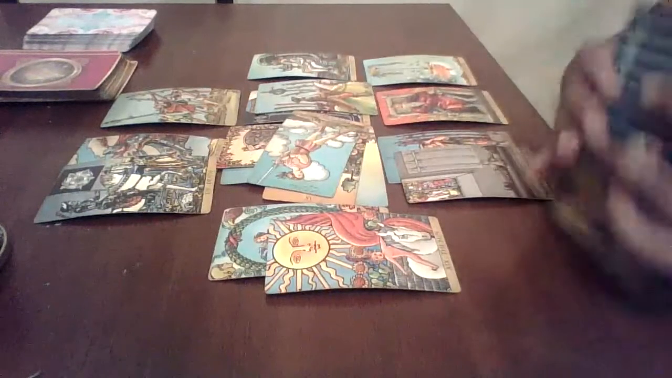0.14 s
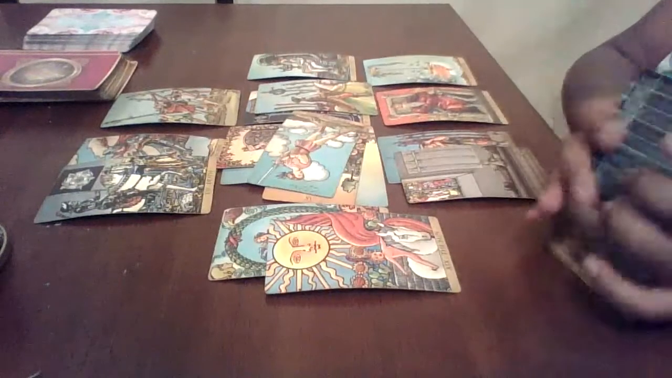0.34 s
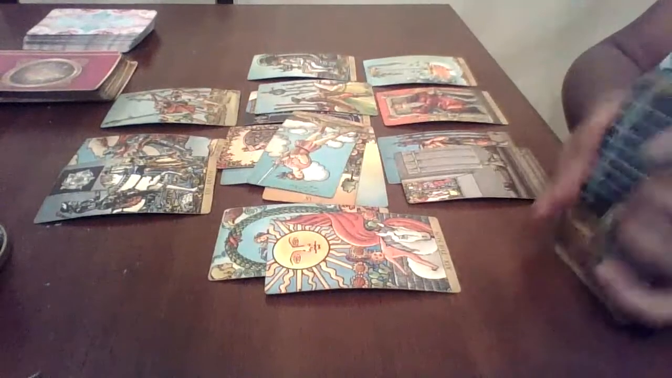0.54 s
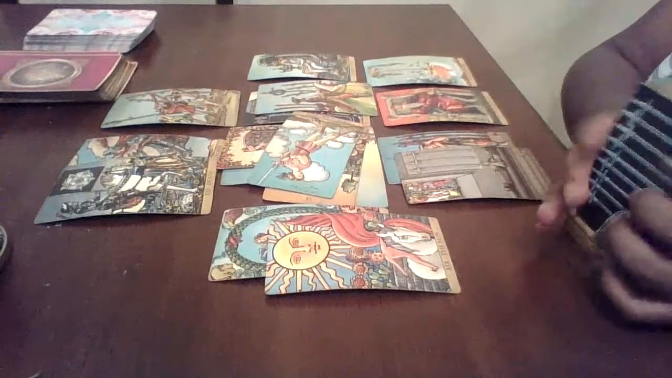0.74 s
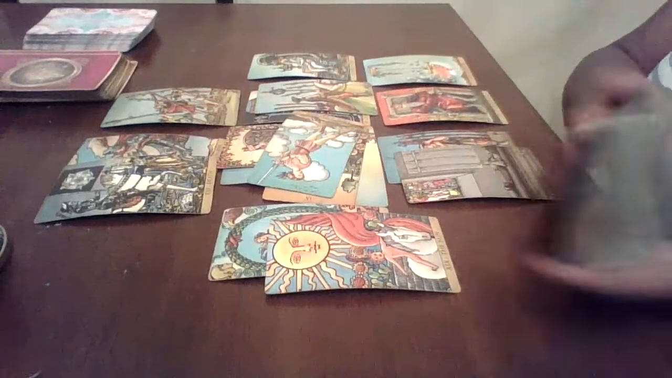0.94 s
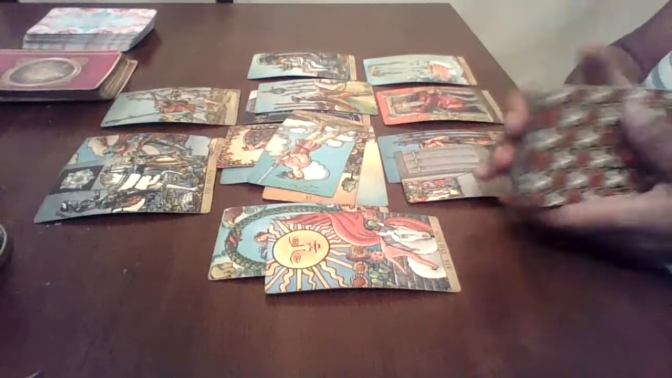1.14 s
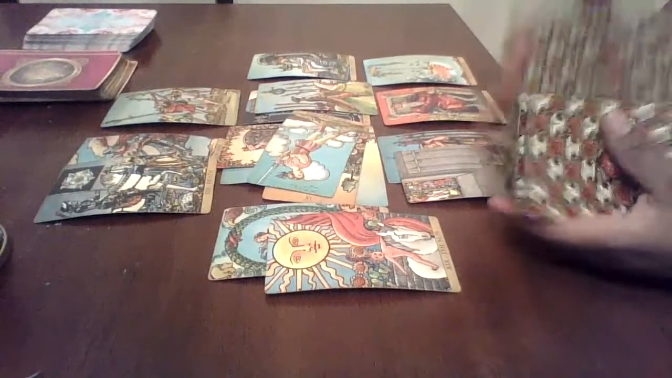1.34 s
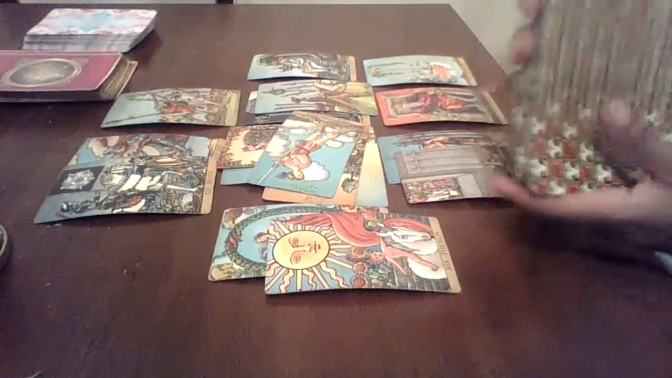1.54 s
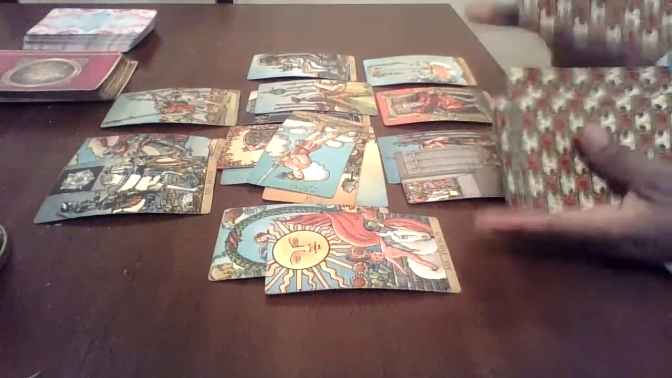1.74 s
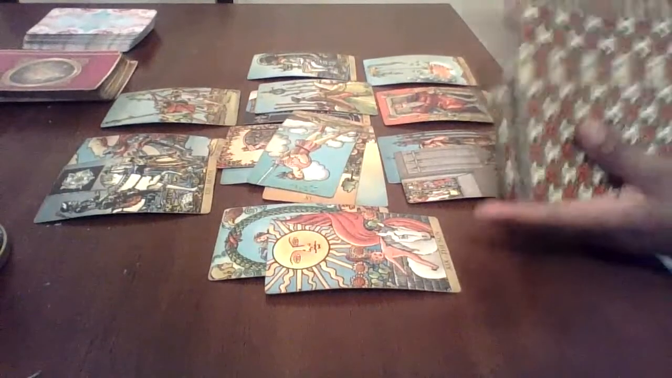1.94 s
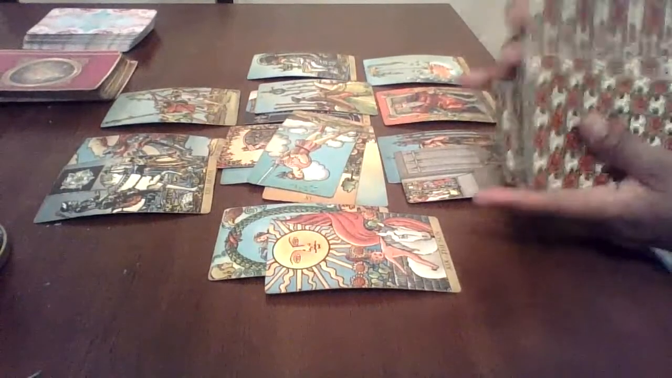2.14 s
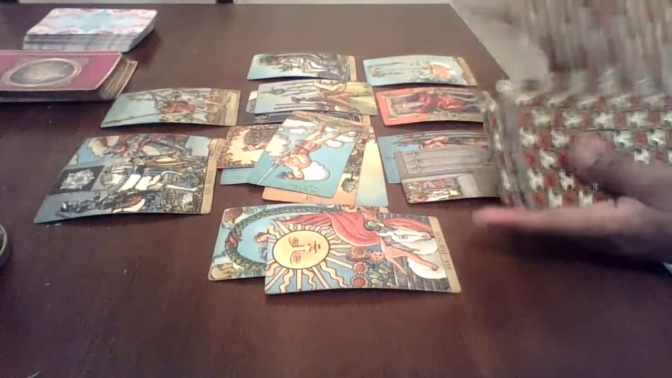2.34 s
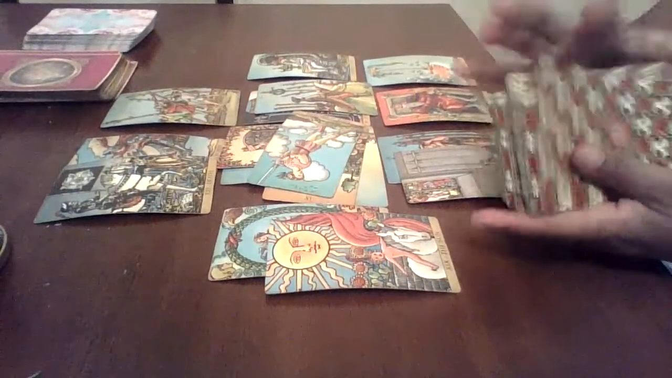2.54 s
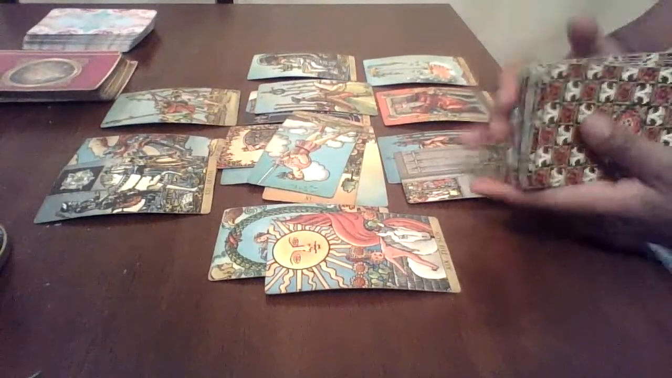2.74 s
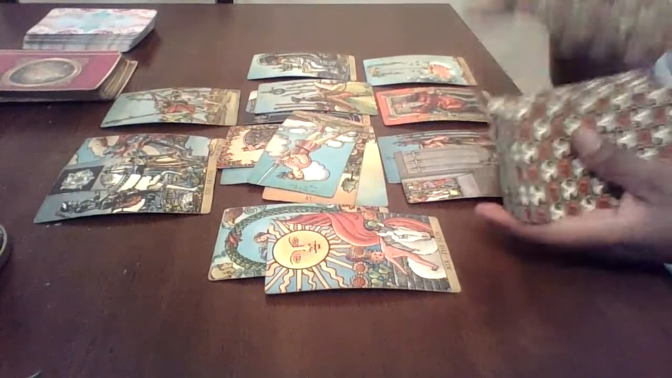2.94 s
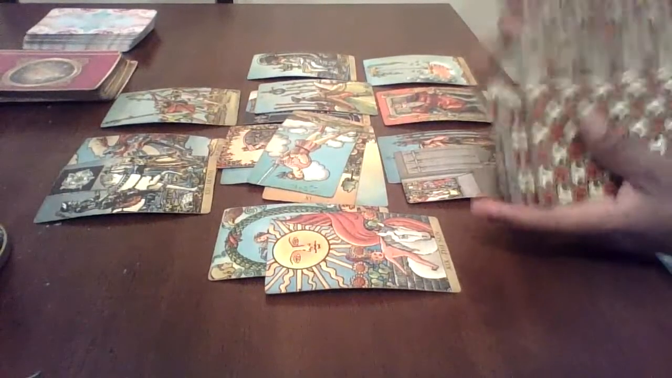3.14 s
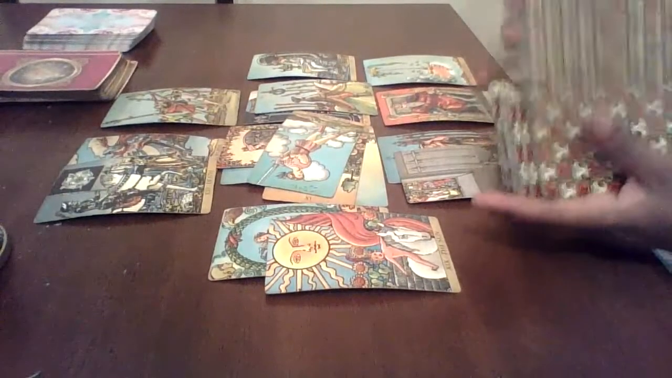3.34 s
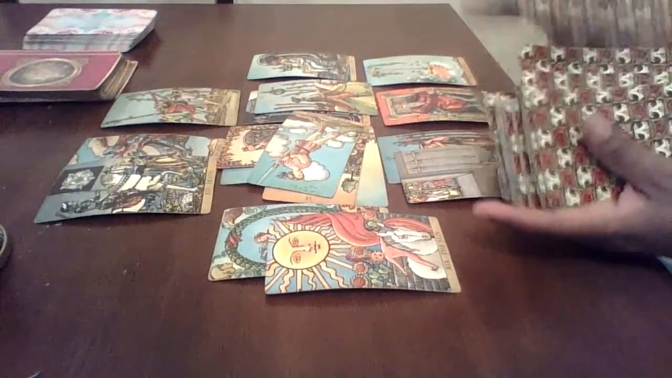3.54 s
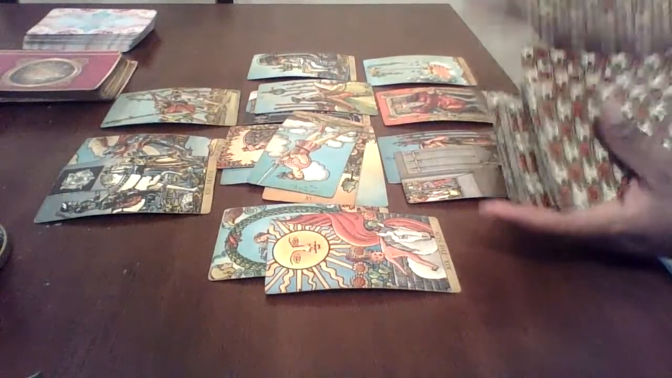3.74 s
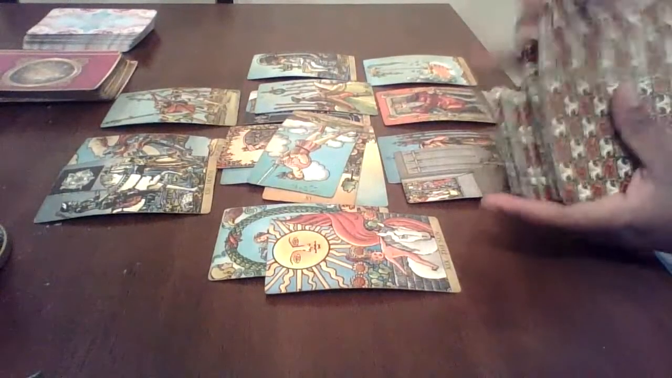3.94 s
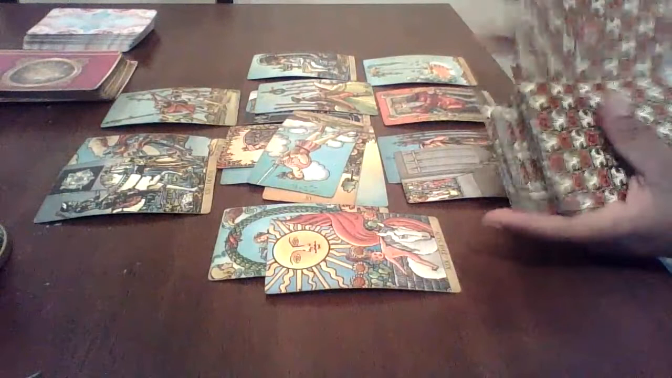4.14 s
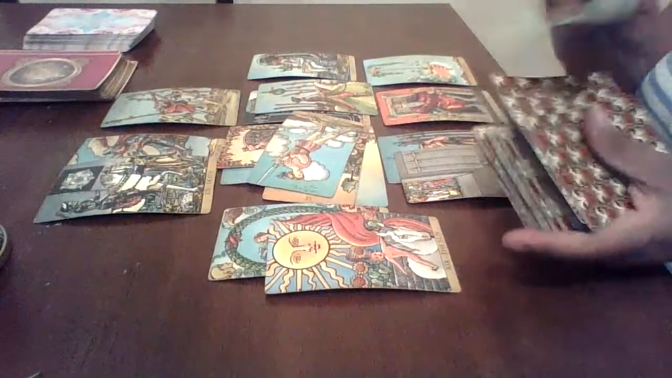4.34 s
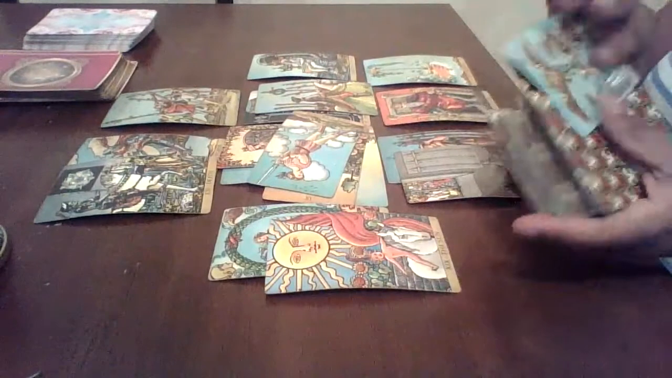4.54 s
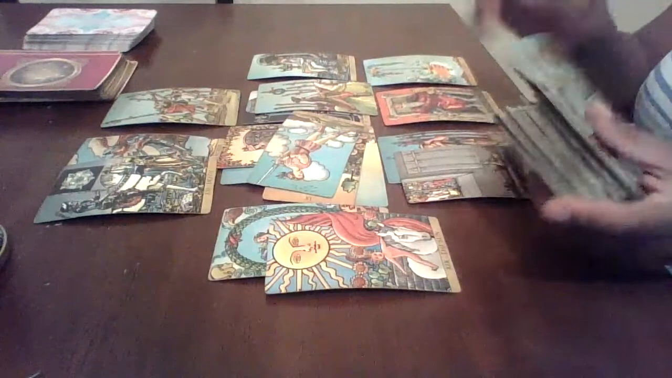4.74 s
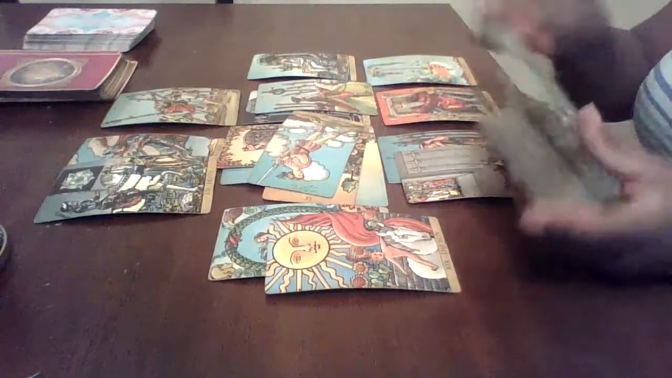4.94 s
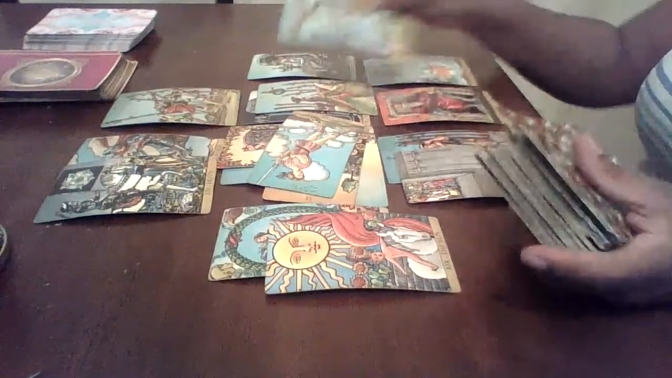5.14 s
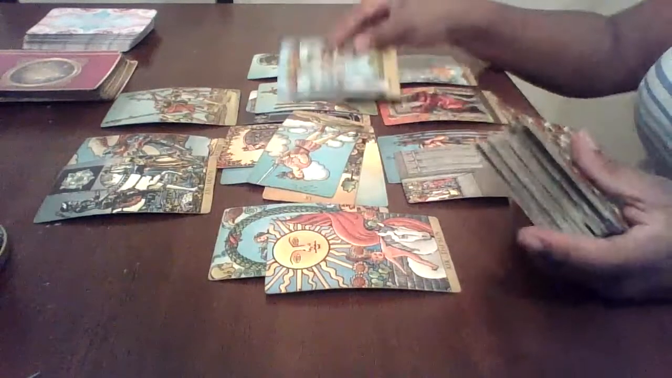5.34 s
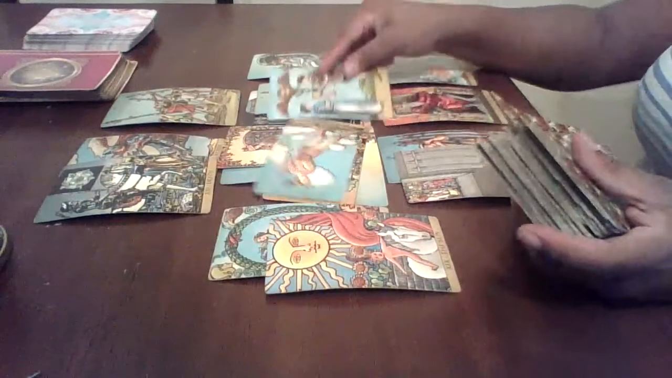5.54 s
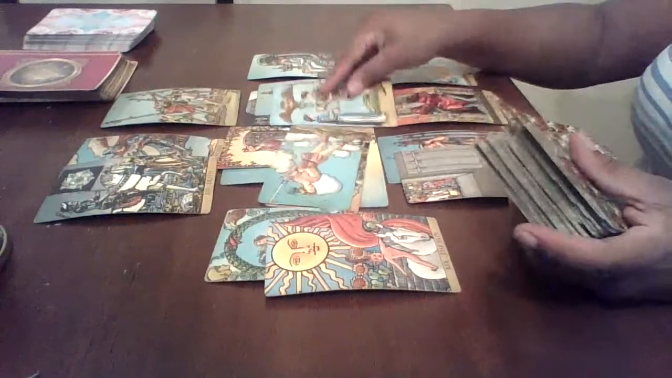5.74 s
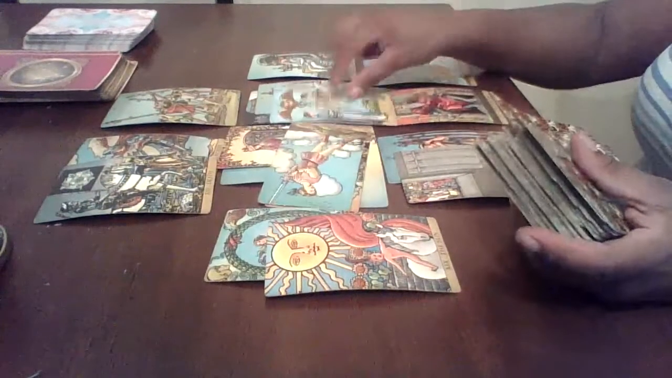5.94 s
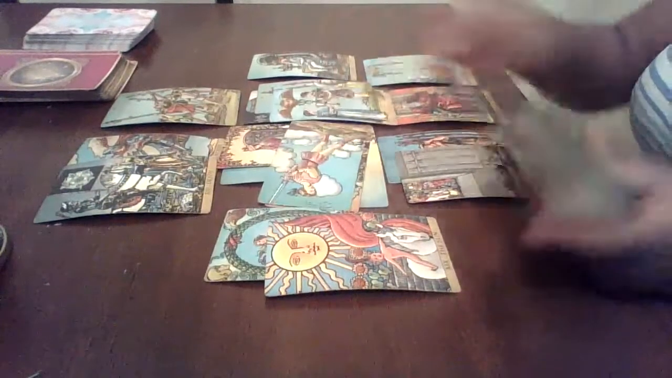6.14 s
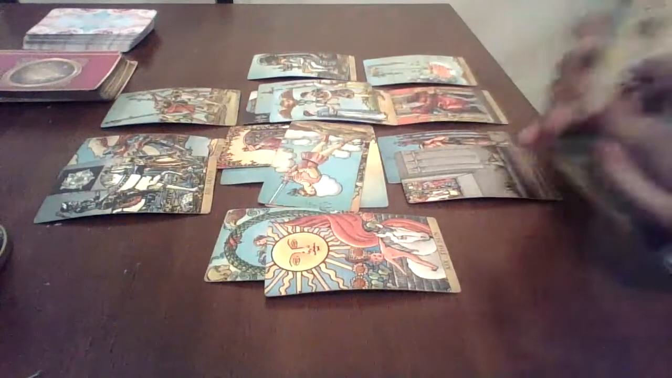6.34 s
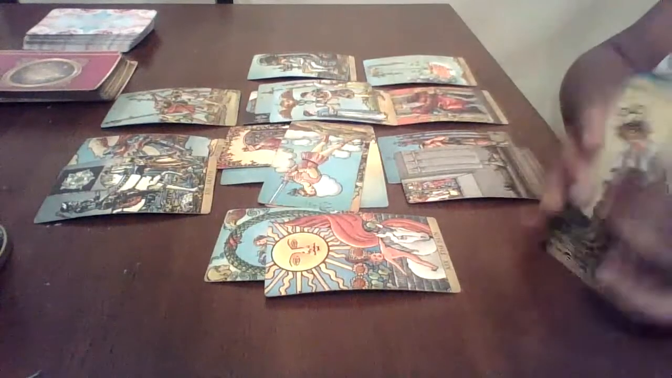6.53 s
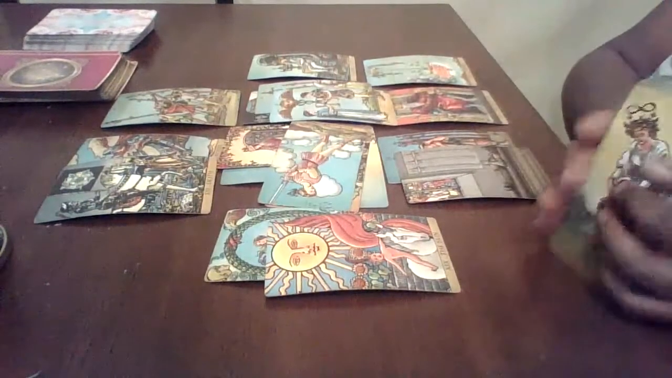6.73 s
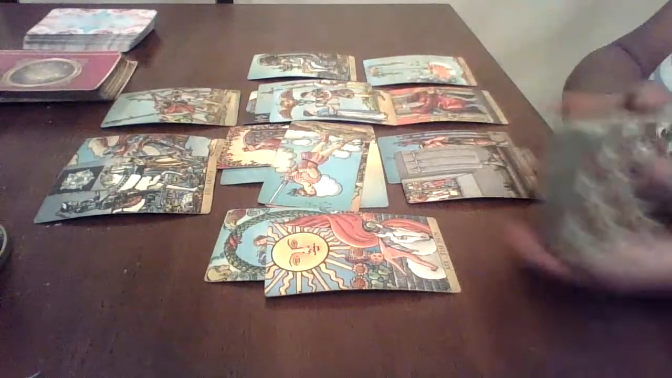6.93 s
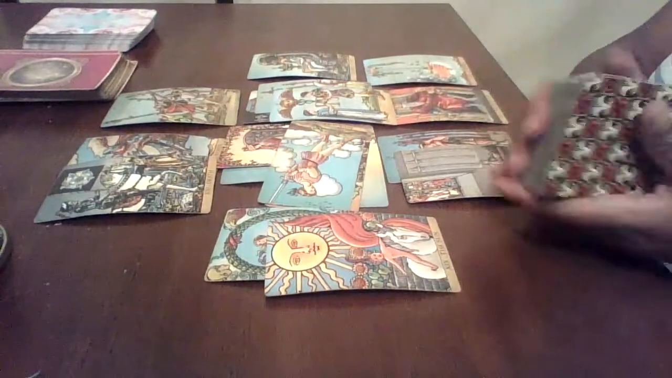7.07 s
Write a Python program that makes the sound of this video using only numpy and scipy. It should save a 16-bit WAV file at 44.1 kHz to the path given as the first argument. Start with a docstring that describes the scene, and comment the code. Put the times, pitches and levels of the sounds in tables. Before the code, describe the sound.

A deck of large cards is knocked on a wooden table, then shuffled overhand, the packets clicking as they meet and hissing as they slide. One packet slaps flat, a few edges tick, and a single card is dealt with a sharp snap. The deck is knocked down again and rubbed into line. It is all close to the microphone, in a room with a low appliance hum.

```python
"""Large cards at a wooden table, close to one microphone, in a room where an appliance hums throughout.
First the deck is knocked square, ringing the table top and the room. From about 1.5 s it is shuffled
overhand: packets click as their edges meet and hiss as they slide, until one slaps flat at 4.25 s.
A few edges tick, and at 5.9 s one card is dealt with a snap. At 6.5 s the deck is knocked down again,
and the fingers rub it into line."""
import sys
import numpy as np
from scipy import signal
from scipy.fft import rfft, irfft, next_fast_len
from scipy.io import wavfile

SR = 44100
rng = np.random.default_rng(int(sys.argv[2]) if len(sys.argv) > 2 else 0)


def inscribe(sig):
    """Save sig as 16-bit PCM at rate SR to the path in sys.argv[1].

    A 1-D sig is mono; a 2-D sig holds one channel per row.
    Samples are clipped to [-1, 1] before scaling.
    """
    pcm = np.round(np.clip(np.atleast_2d(sig).T, -1, 1) * 32767)
    wavfile.write(sys.argv[1], SR, pcm.astype(np.int16))


N = 315312
TIME = np.arange(N) / SR
AGE = TIME[:SR // 4]  # seconds since a contact
FFT_SIZE = next_fast_len(N, real=True)
FFT_HZ = np.arange(FFT_SIZE // 2 + 1) * SR / FFT_SIZE


def from_db(db):
    return 10 ** (np.asarray(db) / 20)


def unit_rms(x):
    return x / np.sqrt(np.mean(x ** 2) + 1e-20)


def at_hz(points, hz):
    point_hz, value = np.transpose(points)
    return np.interp(np.log(np.maximum(hz, 1)), np.log(point_hz), value)


def band(x, low_hz, high_hz, order=2):
    return signal.sosfilt(signal.butter(order, [low_hz, high_hz], "band", fs=SR, output="sos"), x)


def dulled(x, top_hz):
    """Gentle roll-off of the treble."""
    pole = np.exp(-2 * np.pi * top_hz / SR)
    return signal.lfilter([1 - pole], [1, -pole], x)


def coloured(x, spectrum):
    """Gives a steady noise its spectrum; rms 1."""
    return unit_rms(irfft(rfft(x, FFT_SIZE) * from_db(at_hz(spectrum, FFT_HZ)), FFT_SIZE)[:N])


def drift(rate_hz):
    """Smooth random motion; rms 1."""
    spectrum = rfft(rng.standard_normal(FFT_SIZE)) / (1 + (FFT_HZ / rate_hz) ** 2)
    return unit_rms(irfft(spectrum, FFT_SIZE)[:N])


def fade(t, t60):
    return np.exp(-np.log(1000) * t / t60)


# room tone, air and rumble: (frequency [Hz], relative level [dB])
AIR_SPECTRUM = [(120, -36), (200, -9.5), (236, -3.5), (258, -13.5), (293, 2), (327, -10), (399, -4.5),
                (607, -14.5), (742, -12), (827, -21), (1450, -23), (1680, -27), (2600, -31.5),
                (4030, -38.5), (15500, -42.5)]
RUMBLE_SPECTRUM = [(10, -21), (18, -1), (24, -8.5), (30, 9), (38, 7), (48, -17), (65, -8.5), (90, -2),
                   (105, -6), (135, -3), (175, -4.5), (205, -12), (260, -43.5)]
# the appliance in the background: (frequency [Hz], level [dB], unsteadiness [ratio])
HUM_LINES = [(119.9, -59.5, 0.24), (148.6, -50.5, 0.63), (234, -65, 1), (306.6, -65, 0.95)]

def background(air_db=-54, rumble_db=-47.5):
    """Behind the table, the appliance's wavering hum lies over a low rumble and the rush of air."""
    out = from_db(air_db) * coloured(rng.standard_normal(N), AIR_SPECTRUM)
    out += from_db(rumble_db) * coloured(rng.standard_normal(N), RUMBLE_SPECTRUM)
    for hz, db, unsteady in HUM_LINES:
        swing = (1 + unsteady * (drift(5.3) + 1j * drift(2.5))) / np.sqrt(1 + 2 * unsteady ** 2)
        out += from_db(db) * np.sqrt(2) * np.real(swing * np.exp(2j * np.pi * hz * TIME))
    return out


# the room's reverberation: (frequency [Hz], t60 [s])
ROOM_DECAY = [(100, 0.7), (500, 0.58), (2000, 0.61), (4500, 0.53), (8000, 0.49), (15000, 0.5)]

def room_echo(sources, build_s=0.00053, ripple_db=2.3):
    """In each band the room stores the sources' energy and returns it to the microphone as dying noise."""
    ripple = from_db(ripple_db * drift(41)[:N // 2 + 1])  # some pitches stand out from their neighbours
    diffuse = irfft(rfft(rng.standard_normal((2, N))) * ripple, N)
    floor = 1e-12 * diffuse[0]
    echo = np.zeros(N)
    edges_hz = np.geomspace(60, 18000, 16)
    for k, (low, high) in enumerate(zip(edges_hz, edges_hz[1:])):
        hz = np.sqrt(low * high)
        power = sum((from_db(at_hz(send, hz)) * band(x + floor, low, high)) ** 2 for x, send in sources)
        decay_s = at_hz(ROOM_DECAY, hz) / np.log(10 ** 6)
        for seconds in (build_s, decay_s):
            pole = np.exp(-1 / (seconds * SR))
            power = signal.lfilter([1 - pole], [1, -pole], power)
        echo += np.sqrt(power) * unit_rms(band(diffuse[k % 2], low, high))
    return echo


# the room's low standing waves: (frequency [Hz], relative level [dB], t60 [s])
STANDING_WAVES = [(66, -6, 0.42), (115.4, -10.5, 0.28)]

def room_boom(knock, wall_delay_s=0.031):
    """The bass of a knock comes back off the far wall and sets the standing waves going."""
    waves = sum(from_db(db) * fade(AGE, t60) * np.sin(2 * np.pi * hz * AGE) * 2 * np.pi * hz / SR
                for hz, db, t60 in STANDING_WAVES)
    bass = signal.fftconvolve(knock, waves)[:N] + from_db(10) * band(knock, 42, 102)
    return np.interp(TIME - wall_delay_s, TIME, bass, left=0)


# a hand nudging the table: (time [s], level [dB])
NUDGES = [(4.132, -32.5), (4.173, -31), (4.196, -34)]

def table_bumps(width_s=0.0043):
    """Soft pushes rock the table top for a single swing."""
    out = np.zeros(N)
    for s, db in NUDGES:
        offset = (TIME - s) / width_s
        out += from_db(db) * (1 - offset ** 2) * np.exp(-offset ** 2 / 2)
    return out


# glossy faces squeaking: (time [s], pitch [Hz], level [dB])
FACE_SQUEAKS = [(0.771, 5720, -47), (.778, 7040, -41), (2.924, 9000, -45), (2.939, 8400, -38.5)]

def squeaks(width_s=0.00054, waver=0.018):
    """A few milliseconds of fast stick-slip make a tiny chirp."""
    wavering_time = np.cumsum(1 + waver * drift(400)) / SR
    return sum(from_db(db) * np.exp(-((TIME - s) / width_s) ** 2 / 2)
               * np.sin(2 * np.pi * hz * wavering_time) for s, hz, db in FACE_SQUEAKS)


def friction(spectrum, grains_per_s, grain_db, judder_db):
    """Paper fibres catch and let go in grainy noise; an unsteady hand shifts its colour and level."""
    grains = (rng.random(N) < grains_per_s / SR) * rng.standard_normal(N)
    texture = rng.standard_normal(N) + from_db(grain_db) * unit_rms(grains)
    edges_hz = np.geomspace(600, 19000, 7)
    patchy = sum(band(texture, low, high) * from_db(judder_db * drift(52)) * (-1) ** k
                 for k, (low, high) in enumerate(zip(edges_hz, edges_hz[1:])))
    return coloured(patchy, spectrum) * from_db(judder_db * drift(85))


# sliding faces and edges, heard close up: (frequency [Hz], relative level [dB])
FACE_HISS = [(2500, -42), (4500, -2.5), (7000, 1.5), (10000, -1.5), (14000, 4), (16000, -1)]
EDGE_RASP = [(600, -7), (1100, -12), (1700, 4.5), (2200, -9.5), (3000, 1), (4200, -7.5), (7000, -17)]
# fingers pushing the cards into line: (fastest moment [s], rise [s], hiss [dB], rasp [dB])
FINGER_PUSHES = [(.15, .06, -65, -83), (.91, 0.16, -55.5, -67), (1.385, 0.063, -56.5, -66),
                 (1.69, 0.043, -60, -66), (2.9, 0.15, -63.5, -67), (4.1, 0.031, -57, -57.5),
                 (4.235, 0.055, -66, -64), (5.9, 0.047, -56, -56), (6.26, 0.16, -63.5, -64.5),
                 (6.39, 0.053, -62.5, -68), (6.85, 0.17, -53, -62.5)]

def finger_rubs(stop_share=0.52, creep_db=-75, fidget_db=4):
    """Each push speeds up, then stops in a share of that time; the cards creep faintly in the shuffle."""
    shuffling = (TIME > 1) & (TIME < 4.55)
    hiss = from_db(creep_db + fidget_db * drift(8.6)) * shuffling
    rasp = np.zeros(N)
    for fastest_s, rise_s, hiss_db, rasp_db in FINGER_PUSHES:
        speed = np.interp((TIME - fastest_s) / rise_s, [-1, 0, stop_share], [0, 1, 0]) ** 0.98
        hiss += from_db(hiss_db) * speed
        rasp += from_db(rasp_db) * speed
    return (hiss * friction(FACE_HISS, grains_per_s=440, grain_db=-6.5, judder_db=2)
            + rasp * friction(EDGE_RASP, grains_per_s=400, grain_db=1.5, judder_db=0.9))


# overhand strokes: (landing [s], body [dB], ring [dB], drag length [s], letting go [dB], hiss [dB])
OVERHAND_STROKES = [(1.5562, -47.5, -42, 0.07, -52.5, -55.5), (1.8514, -45.5, -44, 0.041, -46, -56.5),
                    (2.0615, -51, -58, 0.083, -64, -59.5), (2.4295, -46, -48, 0.042, -57, -56),
                    (3.0833, -40.5, -28, 0.049, -49.5, -57), (3.3665, -52, -38, 0.05, -54, -55),
                    (3.637, -55, -36, 0.068, -52, -55.5), (3.9153, -50, -55, 0.039, -54, -53.5),
                    (4.1425, -52, -54, 0.1, -57, -57.5)]
DRAG_OVERRUN_S = 0.015  # the slide outlasts the letting go

def packet_drags(attack_s=0.0092, sag_db=-1, release_t60=0.23, rasp_db=-5.5):
    """Each packet slides as it lands, eases mid-drag and is pulled free; faces hiss, edges rasp."""
    speed = np.zeros(N)
    for s, _, _, drag_s, _, hiss_db in OVERHAND_STROKES:
        age = TIME - s
        attack = np.interp(age, [-attack_s, 0], [0, 1])
        sag = from_db(sag_db * np.sin(np.pi * np.clip(age / drag_s, 0, 1)) ** 2)
        release = fade(np.clip(age - drag_s - DRAG_OVERRUN_S, 0, 1), release_t60)
        speed += from_db(hiss_db) * attack * sag * release
    hiss = dulled(friction(FACE_HISS, grains_per_s=560, grain_db=-2, judder_db=2), top_hz=12200)
    rasp = friction(EDGE_RASP, grains_per_s=450, grain_db=0, judder_db=3)
    return speed * (hiss + from_db(rasp_db) * rasp)


def strikes(contacts, modes, *, pulse_db, crack_t60, top_hz, chatter_db, chatter_t60, chatter_top_hz,
            modes_db, detune, ring_top_hz=4400):
    """Each contact is a sharp pulse, a crack, the chatter of loose card edges and ringing modes."""
    # thump, body, ring and crack; a contact with three levels has no thump
    registers_hz = [(45, 450), (450, 900), (1150, ring_top_hz), (ring_top_hz, 17000)]
    onset = round(0.006 * SR)  # a register's level holds for its first 6 ms
    hz, mode_db, t60 = np.transpose(modes)[:, :, None]
    decays = fade(AGE, t60)
    out = np.zeros(N)
    for s, *levels_db in contacts:
        gain = rng.choice([-1, 1], hz.shape) * from_db(mode_db + rng.normal(0, 2.6, hz.shape))
        pitch = hz * (1 + detune * rng.standard_normal(hz.shape))
        ringing = np.sum(gain * decays * np.sin(2 * np.pi * pitch * AGE), axis=0)
        noise = rng.standard_normal(len(AGE))
        chatter = from_db(chatter_db) * dulled(noise, chatter_top_hz) * fade(AGE, chatter_t60)
        burst = noise * fade(AGE, crack_t60) + chatter
        burst[0] -= from_db(pulse_db)
        gentleness = np.interp(max(levels_db), [-58, -42], [0.9, 0])
        burst *= 1 - gentleness * fade(AGE, 0.0027)  # a light touch eases in as a scuff
        sound = dulled(burst, top_hz) + from_db(modes_db) * ringing
        start = round(s * SR)
        for (low, high), db in zip(registers_hz[-len(levels_db):], levels_db):
            register = band(sound, low, high, order=3)[:N - start]
            out[start:start + len(register)] += from_db(db) * register / np.std(register[:onset])
    return out


# single edges slipping off a finger: (time [s], level [dB])
EDGE_SLIPS = [(1.3931, -57.5), (1.6395, -55), (2.3129, -62), (2.9381, -52), (4.0122, -53.5), (4.469, -56.5),
              (4.5616, -62), (4.8741, -61.5), (4.9456, -64), (6.273, -59.5), (6.3835, -74)]

def edge_ticks(catches_per_drag=2):
    """Edges slip, catch at random in a drag or let go at its end: (time [s], body, ring, crack [dB])."""
    ticks = list(EDGE_SLIPS)
    for s, _, _, drag_s, letting_go_db, hiss_db in OVERHAND_STROKES:
        ticks.append((s + drag_s, letting_go_db))
        sliding_s = drag_s + DRAG_OVERRUN_S
        for moment, softness in zip(rng.random(catches_per_drag), rng.standard_normal(catches_per_drag)):
            ticks.append((s + moment * sliding_s, hiss_db - 1 - 4 * softness))
    return [(s, db - 7.5, db, db + 1) for s, db in ticks]


def landings(brush_lead_s=0.0056, brush_db=-12.5):
    """One corner brushes the deck, then the packet drops on it: (time [s], body, ring, crack [dB])."""
    return [(s - lead_s, body_db + db, ring_db + db, ring_db + db - 11.5)
            for s, body_db, ring_db, *_ in OVERHAND_STROKES
            for lead_s, db in ((brush_lead_s, brush_db), (0, 0))]


# a packet held in the hand: (frequency [Hz], relative level [dB], t60 [s])
HELD_PACKET_MODES = [(662, 5.5, 0.029), (1540, 4, 0.019), (1724, 0.5, 0.036), (2604, 0, 0.023),
                     (2856, 7.5, 0.012), (3730, 3, 0.0086), (4300, 1.5, 0.0077)]

def card_clicks():
    """Packets land and edges tick; each packet is of another thickness and rings at another pitch."""
    return strikes(landings() + edge_ticks(), HELD_PACKET_MODES, pulse_db=4, crack_t60=0.00068,
                   top_hz=7500, chatter_db=-6, chatter_t60=0.055, chatter_top_hz=9000,
                   modes_db=-9.5, detune=0.047)


# a packet falling flat on the deck and settling: (time [s], body [dB], ring [dB], crack [dB])
SLAP_CONTACTS = [(4.2531, -33.5, -41, -37), (4.2559, -33.5, -27.5, -33), (4.2827, -45.5, -43, -43.5),
                 (4.3022, -52, -50, -55)]
# that packet and the air under it: (frequency [Hz], relative level [dB], t60 [s])
AIR_POCKET_MODES = [(720, -2, 0.056), (1600, 1.5, 0.012), (2830, 7, 0.022), (4340, 5.5, 0.011)]

def packet_slap():
    """Air trapped under the packet gives the slap its hollow pop."""
    return strikes(SLAP_CONTACTS, AIR_POCKET_MODES, pulse_db=9, crack_t60=0.011, top_hz=14000,
                   chatter_db=-21, chatter_t60=0.081, chatter_top_hz=14000, modes_db=-12, detune=0.013)


# a corner flicking off the finger onto the table: (time [s], thump [dB], body [dB], ring [dB], crack [dB])
SNAP_CONTACTS = [(5.9052, -53, -35, -26.5, -42), (5.9076, -34.5, -41, -24, -20.5)]
# one stiff card: (frequency [Hz], relative level [dB], t60 [s])
STIFF_CARD_MODES = [(708, 2, 0.04), (1600, 8, 0.014), (2740, 8.5, 0.012), (3700, 0, 0.016),
                    (5400, -8, 0.013), (7230, 0, 0.015)]

def card_snap():
    """The dealt card is bent and springs flat: a very short, bright crack."""
    return strikes(SNAP_CONTACTS, STIFF_CARD_MODES, pulse_db=13, crack_t60=0.0016, top_hz=8000,
                   chatter_db=-12, chatter_t60=0.066, chatter_top_hz=12000, modes_db=-12.5, detune=0.013)


# the deck striking the table, packet after packet:
# (time [s], thump [dB], body [dB], ring [dB], crack [dB], top of the ring [Hz])
DECK_CONTACTS = [(0.2256, -45, -34.5, -41.5, -50, 3000), (.232, -39, -47, -35, -48, 4200),
                 (.237, -55, -32.5, -28, -36.5, 4120), (0.2444, -33.5, -30, -33, -56, 4180),
                 (0.2576, -35, -56, -24.5, -39, 4300), (.559, -60, -39, -47, -55, 3200),
                 (0.5756, -26, -29.5, -40, -42.5, 3200), (.656, -51, -46, -51, -60, 3200),
                 (6.501, -31, -49, -27.5, -41, 3400), (6.5037, -28, -23, -22.5, -22, 3160),
                 (6.5178, -25, -22.5, -20, -36, 2600)]
# the wooden table top: (frequency [Hz], relative level [dB], t60 [s])
TABLE_TOP_MODES = [(187, -9, 0.03), (334, -15.5, 0.46), (382, -16, 0.17), (566, 7.5, 0.034), (685, 2, 0.17),
                   (796, 8, 0.054), (849, -6, 0.037), (1110, -7, 0.15), (1260, -1.5, 0.077),
                   (1630, 4, 0.045), (2044, -4, 0.091), (2540, 1, 0.075), (3020, 0.5, 0.022)]

def deck_knocks():
    """The edge of the deck lands on the wood, which rings and softens the top of the crack."""
    return sum(strikes([contact], TABLE_TOP_MODES, pulse_db=8.5, crack_t60=0.013, top_hz=2400,
                       chatter_db=0, chatter_t60=0.061, chatter_top_hz=3830,
                       modes_db=-15, detune=0.0084, ring_top_hz=ring_top_hz)
               for *contact, ring_top_hz in DECK_CONTACTS)


# the share of each sound that comes back from the room: (frequency [Hz], level [dB])
SHUFFLE_SEND = [(700, -9), (2000, -9), (5000, -15), (8000, -33), (14000, -33)]
SLAP_SEND = [(400, -9), (950, -0.5), (1500, -8), (3000, -11), (7000, -12), (14000, -12)]
SNAP_SEND = [(400, -7), (1500, -13), (3500, -8), (6300, -4.5), (9000, -19.5), (14000, -15)]
KNOCK_SEND = [(100, -1), (300, -2), (800, -9.5), (1500, -4), (2600, -3), (5000, -7), (7000, -6),
              (12000, -12.5)]

def scene():
    """The hands are near the microphone; the broad table top throws more of its sound into the room."""
    shuffle = packet_drags() + finger_rubs() + squeaks() + card_clicks()
    knocks = deck_knocks()
    sources = [(shuffle, SHUFFLE_SEND), (packet_slap(), SLAP_SEND),
               (card_snap(), SNAP_SEND), (knocks, KNOCK_SEND)]
    direct = sum(x for x, _ in sources) + table_bumps()
    return (direct + room_boom(knocks) + room_echo(sources) + background())[None]


def record(dry):
    """The microphone's one channel is cut steeply above 16 kHz."""
    return signal.sosfilt(signal.ellip(10, 0.2, 70, 16000, fs=SR, output="sos"), dry)


dry = scene()
out = record(dry)
inscribe(out)
```